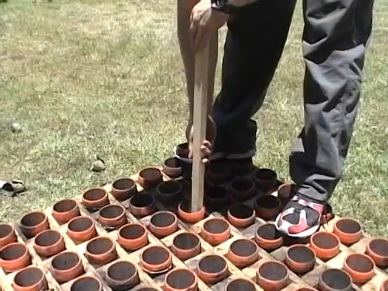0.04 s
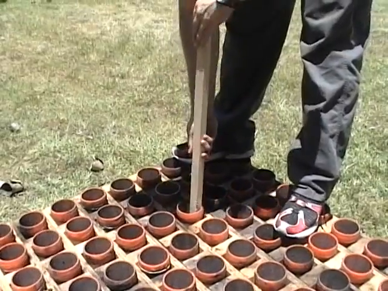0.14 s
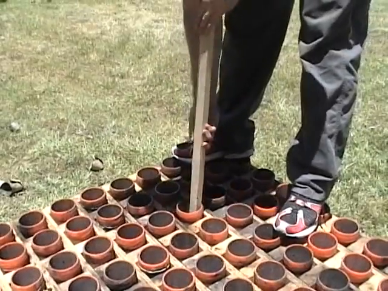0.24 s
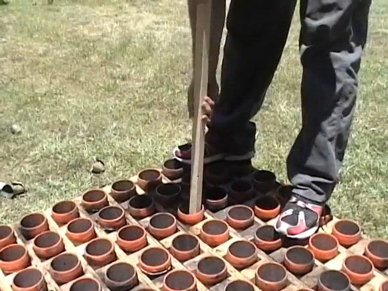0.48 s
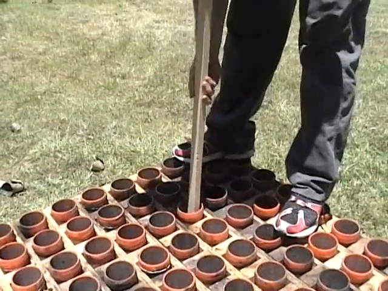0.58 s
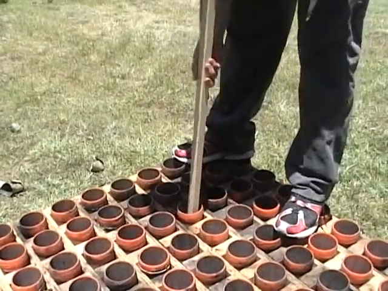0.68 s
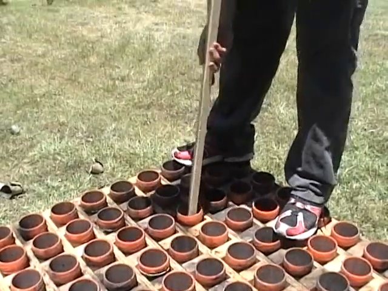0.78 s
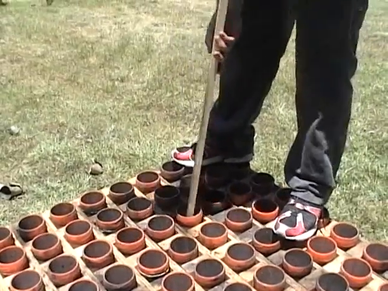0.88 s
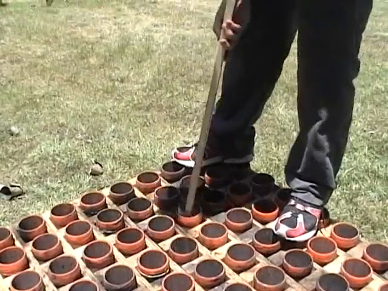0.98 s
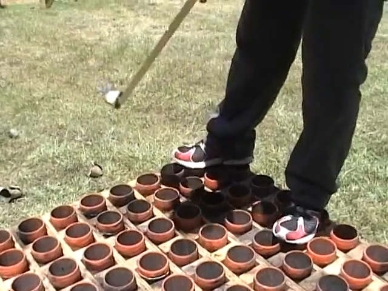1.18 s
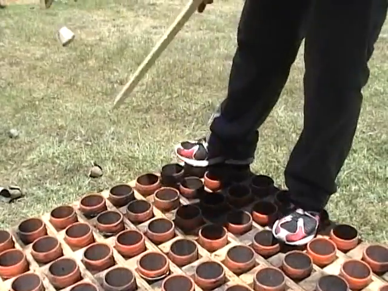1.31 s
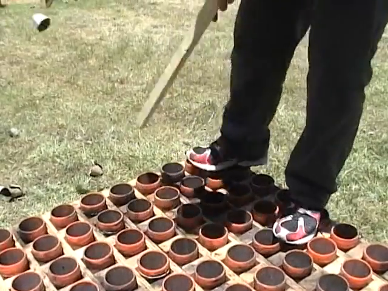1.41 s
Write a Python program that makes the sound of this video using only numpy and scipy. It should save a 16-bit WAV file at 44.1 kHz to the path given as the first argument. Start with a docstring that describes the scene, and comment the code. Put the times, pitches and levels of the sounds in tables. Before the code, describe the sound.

A wooden stick scrapes up out of a hollow tube, knocking the rim as it leaves.

```python
"""A wooden stick drawn out of a mortar tube

On a lawn, the stick's edge rubs up the tube's wall in thousands of tiny slips. They make a dry
rasp and keep stick and tube ringing. The stick squeals and chatters briefly, with one short knock
inside the tube. It knocks on the rim as it leaves, then ticks and scuffs. Light wind touches the
microphone over a quiet outdoor hush."""
import sys
import numpy as np
from scipy import signal
from scipy.fft import rfft, irfft, next_fast_len
from scipy.io import wavfile
from scipy.ndimage import uniform_filter1d, map_coordinates

SR = 44100
rng = np.random.default_rng(int(sys.argv[2]) if len(sys.argv) > 2 else 0)


def unload_wav(signal):
    """Save mono or channel-first audio to the path in sys.argv[1] as 16-bit WAV at rate SR, clipped to [-1, 1]."""
    wavfile.write(
        sys.argv[1],
        SR,
        np.round(np.clip(np.atleast_2d(signal).T, -1, 1) * 32767).astype(np.int16),
    )


N = 63945
T = np.arange(N) / SR

# How loud each sound is as time passes. Each row: time in seconds, relative level in dB.
RASP_LEVEL = [(.04,-61.5),(.1,-36),(.124,-29),(.15,-38.5),(.26,-32),(.342,-32.5),(.37,-40.5),(.405,-40.5),(.465,-34),(.49,-37),(.635,-36.5),(.68,-40.5),(.745,-43.5),(.83,-52),(.89,-41),(.98,-39),(1.008,-41),(1.025,-33),(1.045,-58),(1.12,-53.5)]
STICK_LEVEL = [(.085,-46.5),(.118,-34),(.16,-59),(.335,-34.5),(.38,-46.5),(.62,-50.5),(.83,-63),(1.02,-45)]
RIM_HISS_LEVEL = [(.87,-48),(.925,-40.5),(.975,-37.5),(1.005,-56)]
HOLLOW_LEVEL = [(.26, -48.5), (.336, -35.5), (.45, -44.5), (0.492, -35.5), (.53, -44.5), (.7, -60.5),
                (1.0, -47)]  # the tube's deepest tone; its low, middle and high rings follow
LOW_LEVEL = [(0.07, -54.5), (0.24, -33.5), (0.322, -37), (0.375, -27.5), (.42, -34), (0.6, -56),
             (0.646, -29), (0.69, -35.5), (0.725, -32), (0.84, -37.5), (0.865, -45.5), (1.04, -47)]
MID_LEVEL = [(.1, -51.5), (.26, -28), (.32, -35.5), (.385, -28), (.48, -38.5), (.6, -31.5), (.7, -42.5),
             (.86, -42), (.95, -35.5), (1.02, -42.5)]
HIGH_LEVEL = [(0.07, -50), (0.22, -36), (0.329, -29), (0.45, -40.5), (0.506, -29.5), (0.54, -36.5),
              (0.6, -30.5), (0.72, -38.5), (0.8, -37.5), (0.92, -41.5), (1.03, -50.5)]
SCUFF_LEVEL = [(1.156, -60), (1.158, -40.5), (1.178, -41.5), (1.192, -63)]
WIND_LEVEL = [(0, -51), (.23, -62), (.32, -52.5), (.48, -64), (.95, -48), (1.07, -42), (1.18, -58),
              (1.37, -38.5)]
# Resonances, the pitches a thing likes to ring at. Narrow ones sing and wide ones hiss.
# Each row: pitch in Hz, width in Hz, relative level in dB.
STICK_MODES = [(2940, 290, -11), (3420, 190, 2.5), (3673, 140, 6.5), (5430, 330, 2), (6160, 160, 2)]
RIM_HISS_BAND = [(5200, 4300, 0)]
HOLLOW_MODES = [(509.2, 34, -2), (670, 50, -7)]
LOW_MODES = [(823, 66, -4.5), (871, 33, 1.5), (973, 100, -9)]
MID_MODES = [(992, 48, -11), (1105.3, 53, 2)]
HIGH_MODES = [(1250, 65, 6.5), (1452, 61, -10), (1564, 53, -2.5), (1708, 54, -11.5), (2090, 470, -7.5)]
CLACK_BAND = [(1250, 3900, 0)]
SCUFF_MODES = [(1970, 210, 6), (2660, 170, 6.5), (2950, 69, 4), (4000, 150, -0.5), (4800, 360, -2),
               (8100, 2800, -5)]
# The tube's pitches bend as the stick moves. Each row: time in seconds, pitch multiplier.
HOLLOW_BEND = [(.33, 1.02), (.44, .98), (.65, 1.05)]
LOW_BEND = [(.22, 1.05), (.34, .99), (.47, 1.025), (.7, .995), (.77, .96), (.82, .99)]
MID_HIGH_BEND = [(.3, 1.01), (.42, .992), (.52, 1.0)]
# Gritty catches of the edge. Each row: start in seconds, added level in dB relative to the rubbing.
CATCHES = [(0.322, -3), (0.339, 3), (0.647, -11), (0.742, 9)]
# Brief squeals and chatter, with one short knock inside the tube at 0.5 s.
# Each row: middle in seconds, length in seconds, pitch in Hz, level in dB.
CHATTER_AND_KNOCK = [(0.065, 0.028, 2340, -39), (.266, 0.027, 1108, -26.5), (.503, 0.016, 1538, -25),
                     (0.5684, 0.016, 1146, -20.5), (.587, 0.011, 1134, -20), (0.596, 0.016, 1247, -19),
                     (0.801, 0.028, 1240, -27)]
# Knocks on the rim. Each row: start in seconds, relative level in dB.
RIM_KNOCKS = [(1.005, -30), (1.013, -26.5), (1.02, -31.5), (1.032, -29)]
# The struck tube's tones. Each row: pitch in Hz, relative level in dB, seconds to fade by 60 dB.
STRUCK_TUBE = [(565, -10, 0.23), (985, 5.5, 0.095), (1409, 3, 0.1), (1552, -2.5, 0.15), (1864, -6, 0.11)]
# Ticks of the stick's tip.
# Each row: start in seconds, level in dB, pitch in Hz, width in Hz, seconds to fade by 60 dB.
TICKS = [(1.018, -29.5, 3550, 1790, 0.054), (1.049, -27, 7650, 3500, 0.014),
         (1.064, -39, 7300, 3020, 0.062), (1.074, -35.5, 2680, 380, .06), (1.097, -43.5, 5600, 3000, 0.081)]
# Tone colours, the balance of bass and treble. Each row: frequency in Hz, relative level in dB.
RASP_COLOUR = [(150, -11.5), (350, -6.5), (650, -5), (1000, -2.5), (1900, 4.5), (2800, -2.5), (4500, -1),
               (6000, 0), (9500, -4), (11500, -13)]
SCATTER_COLOUR = [(300, 22), (1800, -35), (4500, 4.5)]
WIND_COLOUR = [(22, -27), (42, 2.5), (68, 13), (110, 0), (200, -57), (500, -33.5)]
HUSH_COLOUR = [(100, -6.5), (240, -4), (462, -13), (972, -14.5), (2410, -21.5), (5190, -29), (7690, -29),
               (14000, -37)]
MIC_COLOUR = [(20, -6), (45, 0), (10200, 0), (12600, -7.5), (14000, -35)]
# How alike the hush is left and right. Each row: frequency in Hz, likeness (1 means identical).
HUSH_LIKENESS = [(400, 0.83), (4000, 0.95), (10000, 0.096)]

SLIPS_PER_S, SLIP_SPREAD_DB = 6000, 4
JUDDER_DB, JUDDER_PER_S = 2.5, 120


def rubbing():
    """Wood slipping on the wall rasps and rings the stick, while the stick's end hisses on the rim."""
    grit = patchy(filtered(slips(), lambda f: amp(along(RASP_COLOUR, f))))
    rasp = amp(0.5) * level(RASP_LEVEL) * steady(grit, size=700)
    stick_ring = level(STICK_LEVEL) * steady(resonate(slips(), STICK_MODES))
    rim_hiss = level(RIM_HISS_LEVEL) * resonate(slips(), RIM_HISS_BAND)
    catches = 1 + sum(amp(db) * fade(s, t60=0.026) for s, db in CATCHES)
    sound = (rasp + stick_ring + rim_hiss) * catches
    echo_s, echo_db = 0.007, -8.5
    return filtered(sound, lambda f: 1 + amp(echo_db) * np.exp(-2j * np.pi * f * echo_s))


def slips():
    """Wood fibres slip on the wall: a dense stream of tiny clicks in juddering clumps."""
    happen = rng.random(N) < SLIPS_PER_S / SR
    size_db = SLIP_SPREAD_DB * rng.standard_normal(N)
    direction = np.sign(rng.standard_normal(N))
    return unit(happen * direction * amp(size_db + JUDDER_DB * wobble(JUDDER_PER_S)))


def patchy(x, depth_db=3.7):
    """The colour of the rubbing shifts at random as the point of contact changes."""
    spectrum = signal.stft(x, nperseg=512)[2]
    patches = uniform_filter1d(rng.standard_normal(spectrum.shape), size=7, axis=0)  # blur in pitch
    patches = uniform_filter1d(patches, size=6, axis=1)  # blur in time
    return unit(signal.istft(spectrum * amp(depth_db * unit(patches)), nperseg=512)[1][:N])


def tube_ring():
    """The rubbing keeps the tube ringing in four groups of tones that swell and fade separately."""
    hollow = level(HOLLOW_LEVEL) * rubbed_tones(HOLLOW_MODES, HOLLOW_BEND)
    low = level(LOW_LEVEL) * rubbed_tones(LOW_MODES, LOW_BEND)
    mid = level(MID_LEVEL) * rubbed_tones(MID_MODES, MID_HIGH_BEND)
    high = level(HIGH_LEVEL) * rubbed_tones(HIGH_MODES, MID_HIGH_BEND)
    return amp(-2) * (hollow + low + mid + high)


def rubbed_tones(modes, bend, waver=0.007):
    """Slips feed each resonance; it follows the pitch bend, and wavers and judders on its own."""
    out = np.zeros(N)
    for hz, width, db in modes:
        tone = steady(unit(filtered(slips(), lambda f: resonance(f, hz, width) ** 2)))
        speed = np.interp(T, *np.transpose(bend)) + waver * wobble(per_s=22)
        bent = map_coordinates(tone, [np.cumsum(speed)], mode="mirror")  # faster sounds higher
        judder_db = JUDDER_DB / 2 * wobble(JUDDER_PER_S)
        out += amp(db + judder_db) * bent
    return unit(out)


def chatter_and_knock():
    """The stick catches in brief squeals and chatter, and knocks once inside the tube."""
    return sum(amp(db) * burst(s, length, hz) for s, length, hz, db in CHATTER_AND_KNOCK)


def rim_knocks():
    """The stick rattles on the rim on its way out: each touch is a short ring and a dry clack."""
    out = np.zeros(N)
    for s, db in RIM_KNOCKS:
        ring = np.zeros(N)
        for hz, tone_db, t60 in STRUCK_TUBE:
            strength = amp(tone_db + rng.normal(0, 2.35))
            ring += strength * fade(s, t60) * np.sin(2 * np.pi * (hz * T + rng.random()))
        clack = amp(1.5) * fade(s, t60=0.086) * resonate(rng.standard_normal(N), CLACK_BAND)
        out += amp(db - 5) * (ring + clack)
    return out


def stick_tip():
    """The tip comes free with light ticks and one short scuff."""
    ticks = np.zeros(N)
    for s, db, hz, width, t60 in TICKS:
        ticks += amp(db) * fade(s, t60) * resonate(rng.standard_normal(N), [(hz, width, 0)])
    scuff = level(SCUFF_LEVEL) * steady(resonate(slips(), SCUFF_MODES), size=256)
    return ticks + scuff


def scatter(x):
    """The rack and the ground bounce a faint, short tail of sound to either side."""
    tail = rng.standard_normal((2, N)) * fade(0, t60=0.048)
    echoes = signal.fftconvolve(x[None], tail / np.linalg.norm(tail[0]), axes=1)[:, :N]
    return filtered(echoes, lambda f: amp(along(SCATTER_COLOUR, f) - 22.5))


def wind(puff_s=0.8425, lag_s=0.00086):
    """Light wind reaches the microphone's two openings differently: a low rumble and one puff."""
    strength = level(WIND_LEVEL) * amp(0.43 * wobble(per_s=14.3))
    rumble = strength * stereo_noise(WIND_COLOUR, likeness=[(60, -0.25)])
    rumble *= amp([[-1], [1]])  # a little louder on the right
    left = -amp(-23) * puff(puff_s)
    right = amp(-15.5) * puff(puff_s + lag_s)
    return rumble + np.array([left, right])


def puff(s, length_s=0.0243, hz=74.3):
    """One brief push of air on the microphone: a low thump with a weaker, higher tone."""
    return burst(s, length_s, hz) + amp(-13) * burst(s, length_s, 2.87 * hz)


def hush():
    """The distant outdoors: soft noise whose level drifts a little."""
    return amp(-44.5 + 1.95 * wobble(per_s=7.37)) * stereo_noise(HUSH_COLOUR, HUSH_LIKENESS)


def stereo_noise(colour, likeness):
    """Noise made of a part both sides share and a part that is opposite left and right."""
    def shares(hz):
        angle = np.arccos(np.clip(along(likeness, hz), -1, 1)) / 2
        return amp(along(colour, hz)) * [np.cos(angle), np.sin(angle)]
    shared, opposite = filtered(rng.standard_normal((2, N)), shares)
    return unit(np.array([shared + opposite, shared - opposite]))


def amp(db):
    """Turn decibels into a multiplier."""
    return 10 ** (np.asarray(db) / 20)


def unit(x):
    """Scale a sound to an average strength (rms) of 1."""
    return x / np.sqrt(np.mean(x ** 2) + 1e-20)


def along(rows, hz):
    """Read between a table's rows on a musical (logarithmic) frequency scale."""
    f, values = np.transpose(rows)
    return np.interp(np.log(hz + 1), np.log(f + 1), values)


def level(rows):
    """Join a table's levels into a volume curve that dies away beyond its ends."""
    s, db = np.transpose(rows)
    outside_s = np.maximum(s[0] - T, 0) + np.maximum(T - s[-1], 0)
    return amp(np.interp(T, s, db) - 310 * outside_s)


def wobble(per_s):
    """A smooth curve through per_s random values each second."""
    return map_coordinates(rng.standard_normal(int(N * per_s / SR) + 4), [T * per_s])


def filtered(x, response):
    """Change each frequency in a sound as the response function says."""
    size = next_fast_len(N + SR // 2)
    return irfft(rfft(x, size) * response(np.fft.rfftfreq(size, 1 / SR)), size)[..., :N]


def resonance(f, hz, width):
    """How a resonance at hz answers each frequency f."""
    return 1j * f * width / (hz * hz - f * f + 1j * f * width)


def resonate(x, modes):
    """Pass a sound through resonances, dulling the treble above the highest one."""
    def response(f):
        peaks = sum(amp(db) * resonance(f, hz, width) for hz, width, db in modes)
        return peaks / np.hypot(1, (f / (1.2 * modes[-1][0])) ** 2)
    return unit(filtered(x, response))


def steady(x, size=1300):
    """Even out swells that last longer than about size samples."""
    return x / np.sqrt(np.abs(uniform_filter1d(x ** 2, size)) + 0.0011)


def fade(s, t60, rise_s=0.0013):
    """Rise quickly at time s, then fall by 60 dB every t60 seconds."""
    age = np.maximum(T - s, 0)
    return (1 - np.exp(-age / rise_s)) * amp(-60 * age / t60)


def burst(s, length, hz):
    """A short tone that swells and dies around time s."""
    swell = np.cos(np.pi * np.clip((T - s) / length, -.5, .5))
    return swell * np.sin(2 * np.pi * hz * (T - s))


def scene():
    """The stick and tube, their faint echoes and the outdoor background."""
    stick = rubbing() + tube_ring() + chatter_and_knock() + rim_knocks() + stick_tip()
    return stick + scatter(stick) + hush() + wind()


def record(dry):
    """The microphone softens the deepest bass, dulls the treble and cuts off the very top."""
    return filtered(dry, lambda hz: amp(along(MIC_COLOUR, hz)) * (hz < 14200))


dry = scene()
out = record(dry)
unload_wav(out)
```